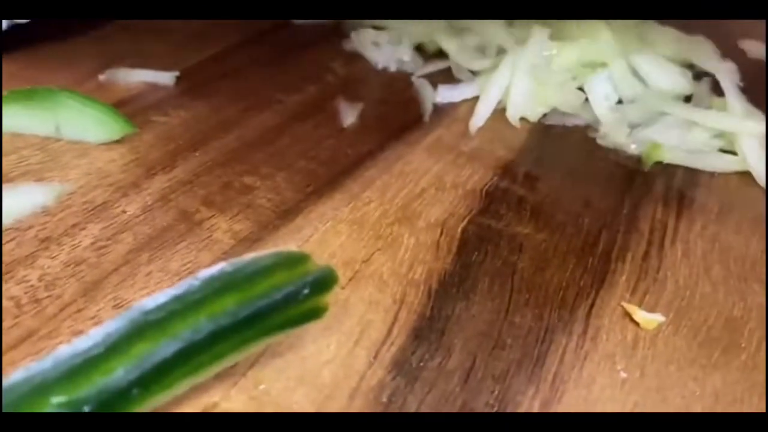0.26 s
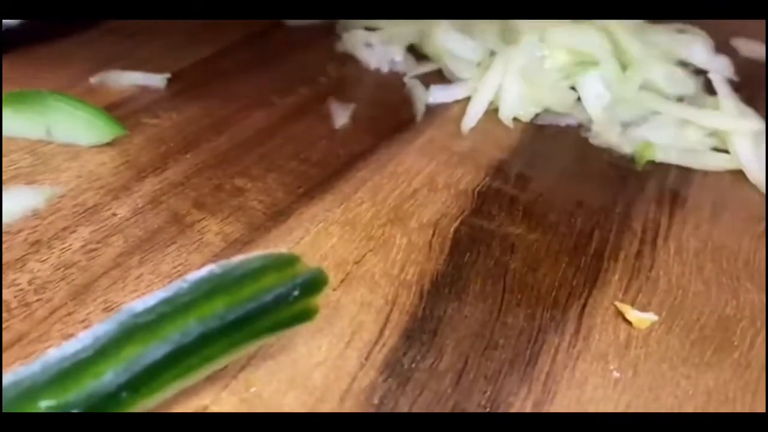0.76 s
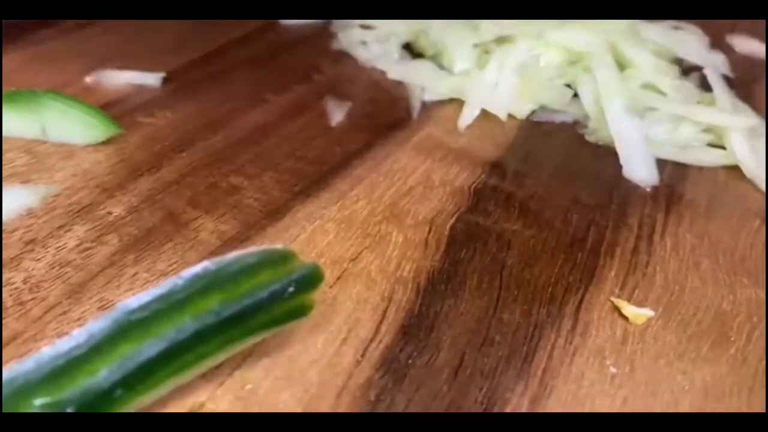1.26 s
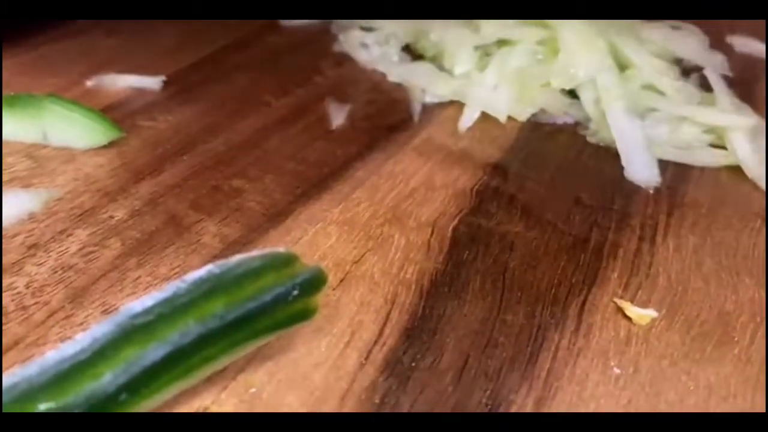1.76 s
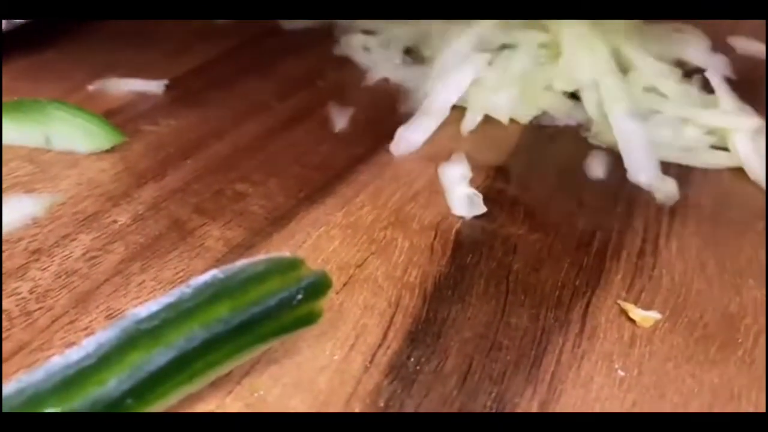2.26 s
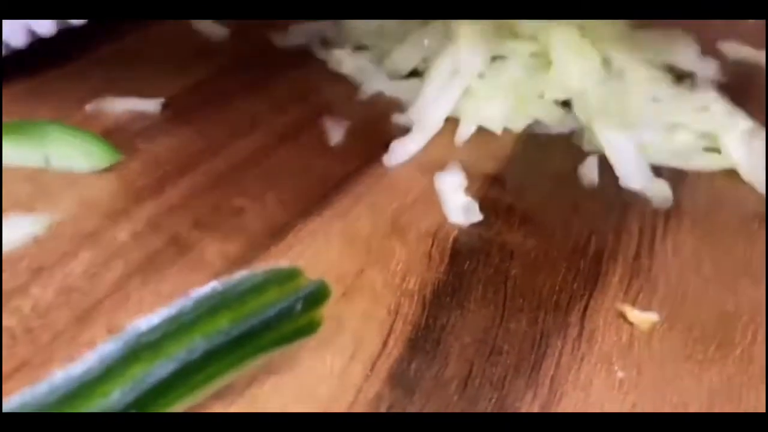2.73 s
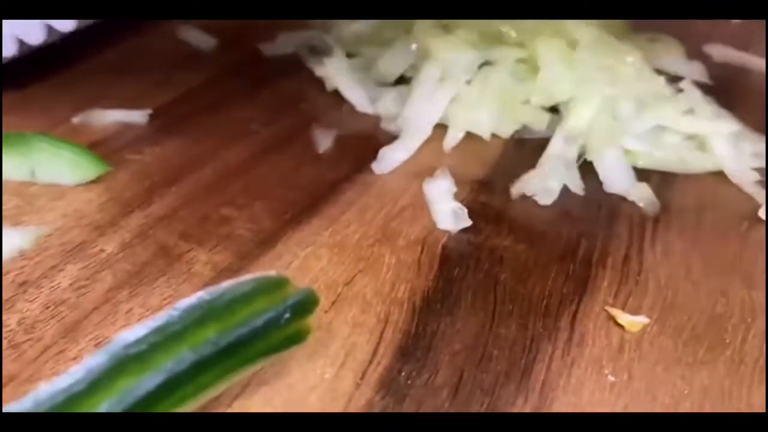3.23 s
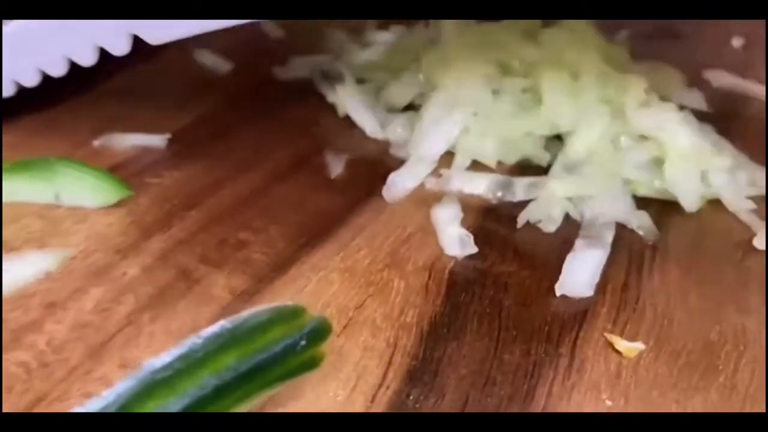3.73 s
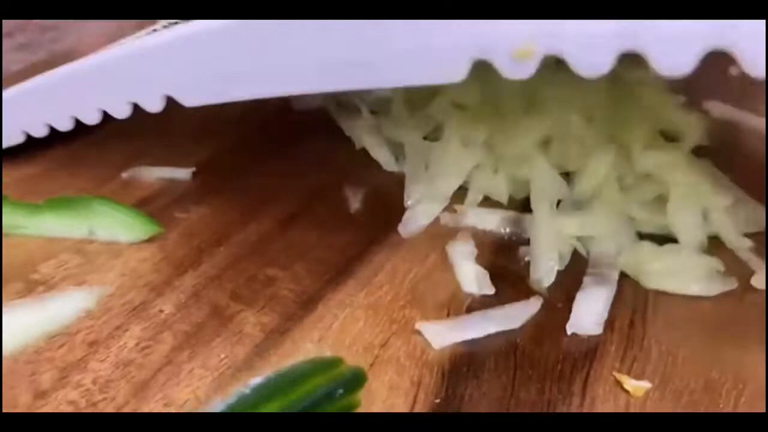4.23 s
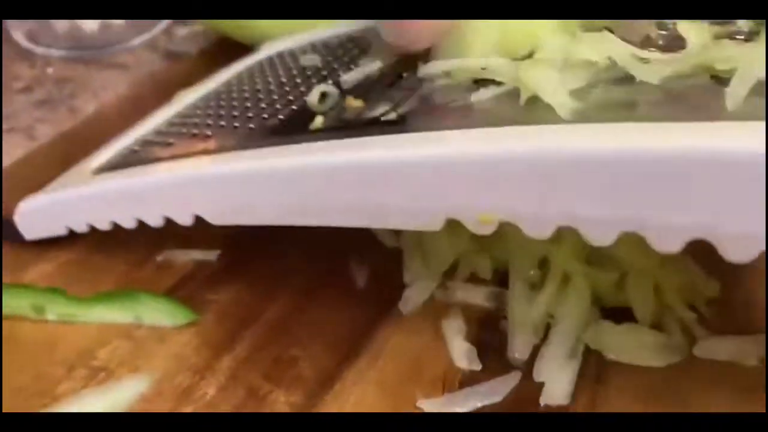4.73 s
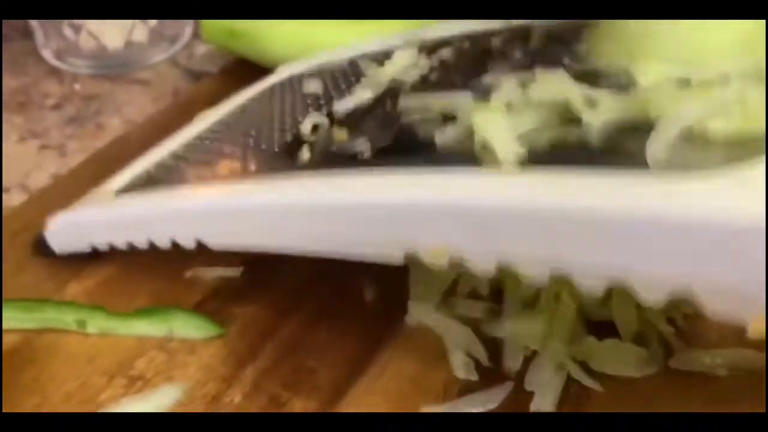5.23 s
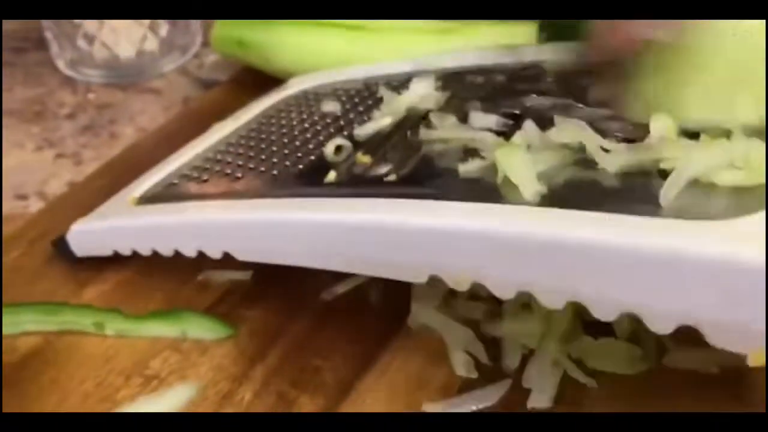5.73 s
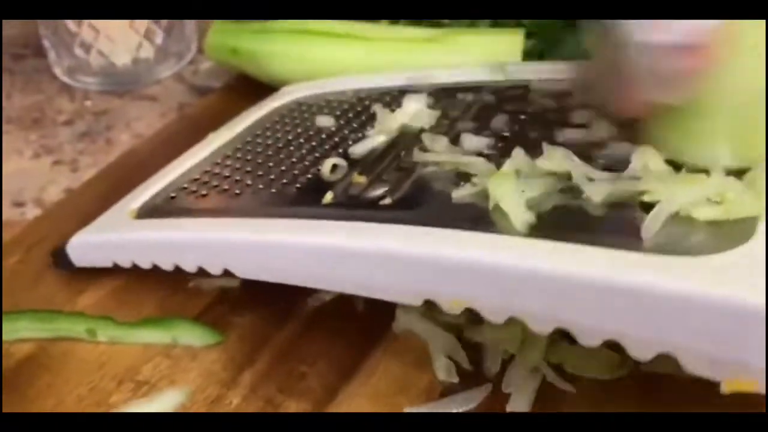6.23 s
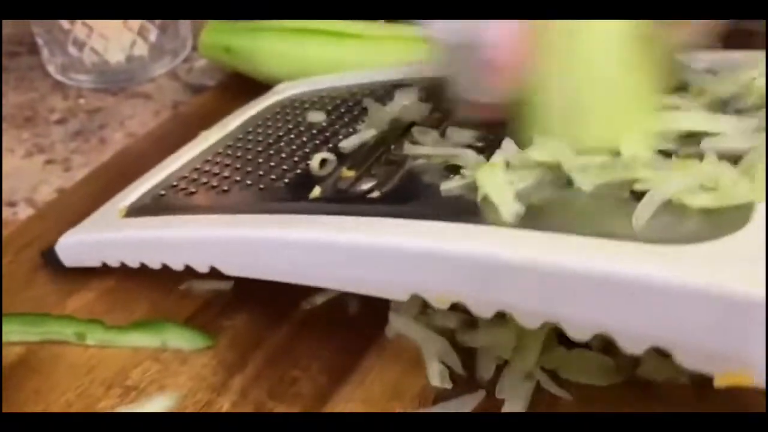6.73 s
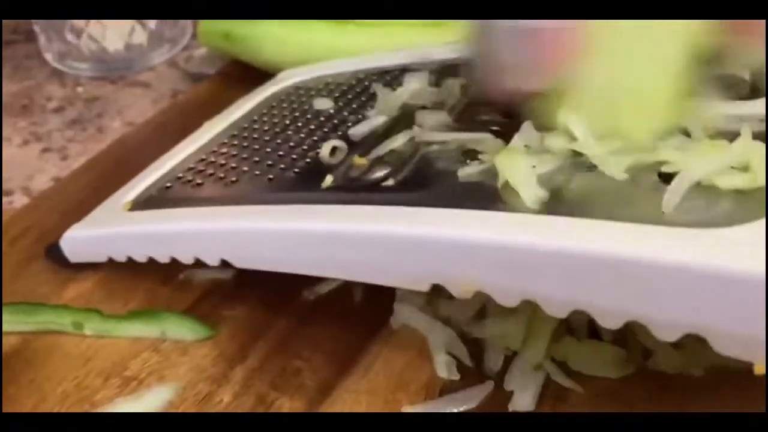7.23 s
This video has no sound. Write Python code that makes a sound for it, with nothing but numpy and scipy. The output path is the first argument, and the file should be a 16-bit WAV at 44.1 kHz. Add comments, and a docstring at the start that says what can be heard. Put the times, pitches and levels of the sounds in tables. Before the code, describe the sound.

A cucumber is rubbed briskly back and forth over a flat metal grater, wet crunchy rasps alternating loud and light, with two short pauses.

```python
"""In a small kitchen, heard from close by on a two-channel phone, a cucumber is rubbed over a flat steel grater.
The hand makes about four round trips a second, with two short rests: cuts are loud, returns light.
The teeth tear the wet flesh in dense tiny snaps, heard directly and through the sheet, frame and board.
The skin cracks now and then, and the plastic frame knocks on a wooden board.
A short room tail and a low rumble of shaped noise lie behind."""
import sys
import numpy as np
from scipy import signal
from scipy.fft import rfft, irfft
from scipy.io import wavfile

SR = 44100
rng = np.random.default_rng(int(sys.argv[2]) if len(sys.argv) > 2 else 0)


def wav_record(signal):
    """Record a signal, one row per channel, as 16-bit PCM in the file named by sys.argv[1]."""
    frames = np.transpose(np.atleast_2d(signal))
    bounded = np.clip(frames, -1, 1)
    # unit amplitude maps onto the largest positive 16-bit level
    quanta = np.round(bounded * 32767).astype(np.int16)
    wavfile.write(sys.argv[1], SR, quanta)


N = 329868

# round trips of the hand, a light return and then a cut; levels are relative:
# cut_start_s, cut_length_s, cut_level_db, return_level_db
ROUND_TRIPS = [(0.032, 0.15, -26.5, -34.5), (0.29, 0.16, -25.5, -36.5), (0.555, 0.15, -24, -31.5),
               (0.815, 0.14, -24.5, -35), (1.575, 0.152, -30.5, -41), (1.814, 0.13, -29, -34.5),
               (2.057, 0.13, -27, -33.5), (2.29, 0.14, -27.5, -33), (2.533, 0.14, -25.5, -30.5),
               (2.772, 0.15, -25, -32.5), (3.029, 0.15, -25.5, -32.5), (3.273, 0.15, -26.5, -32.5),
               (3.515, 0.16, -26.5, -30.5), (3.771, 0.18, -26, -31), (4.035, 0.17, -25.5, -31),
               (4.288, 0.16, -28, -30.5), (4.545, 0.15, -28.5, -34), (5.2, 0.14, -27.5, -40),
               (5.447, 0.14, -32, -38.5), (5.682, 0.16, -31.5, -35.5), (5.935, 0.15, -31.5, -35.5),
               (6.19, 0.15, -29, -34.5), (6.447, 0.15, -27.5, -33), (6.711, 0.16, -26.5, -35),
               (6.966, 0.16, -29, -29), (7.233, 0.17, -25, -32.5), (7.5, 0.15, -19, -28.5)]
# modes of the wooden board with the grater standing on it: mode_hz, width_hz, relative_level_db
BOARD_MODES = [(88.2, 16.3, 1), (147.6, 60, -5.5), (248.3, 13, -5)]


def undb(db):
    """Decibels to gain."""
    return 10 ** (np.asarray(db) / 20)


def unit(x):
    """Scale to rms 1."""
    return x / np.sqrt(np.mean(x ** 2))


def freqs():
    """Frequency of each spectral bin in Hz, kept off zero."""
    return np.maximum(np.arange(N // 2 + 1) * SR / N, 1)


def along(points):
    """A (Hz, value) table joined by lines on a log-frequency axis."""
    hz, value = np.transpose(points)
    return np.interp(np.log(freqs()), np.log(hz), value)


def colour(points):
    """Causal (minimum-phase) response with the given (Hz, dB) shape and unit power gain."""
    cepstrum = irfft(np.log(unit(undb(along(points)))), N)
    # folding the cepstrum forward in time makes the response causal
    cepstrum[1:N // 2] *= 2
    cepstrum[N // 2 + 1:] = 0
    return np.exp(rfft(cepstrum))


def resonator(modes):
    """Response of damped (Hz, width Hz, dB) modes of alternating sign, with unit power gain."""
    f = freqs()
    response = 0
    for k, (hz, width, db) in enumerate(modes):
        detuning = (f * f - hz * hz) / (f * width)
        response = response + (-1) ** k * undb(db) / (1 + 1j * detuning)
    return response / np.sqrt(np.mean(np.abs(response) ** 2))


def through(x, response):
    """Filter x by a frequency response."""
    return irfft(rfft(x) * response, N)


def walk(rate):
    """Random wander of rms 1, heading for a new point rate times a second."""
    points = rng.standard_normal(N // 8)
    return unit(np.interp(np.arange(N) / SR * rate, np.arange(len(points)), points))


def add(track, start_s, sound):
    """Mix a short sound into a track."""
    part = track[max(int(start_s * SR), 0):][:len(sound)]
    part += sound[:len(part)]


def burst(decay_s, size=4096):
    """A dying spatter of contact noise with unit energy."""
    push = rng.standard_normal(size) * np.exp(-np.arange(size) / SR / decay_s)
    return push / np.linalg.norm(push)


def grating(crunch_db=0.5, sheet_db=5.0, frame_db=-21, frame_law=0.86, board_db=-30, board_law=0.62):
    """The tearing is heard directly and through sheet and frame; separate noise drives the board."""
    # spectrum of the torn flesh: frequency_hz, relative_level_db
    crunch_shape = [(145, -3), (510, -8), (1330, -2.5), (2000, -4), (2600, 0), (4000, 0.9), (5200, 1.5),
                    (5900, -2), (7000, 1.6), (9500, -4), (11500, 0.5), (15800, -0.5)]
    # modes of the steel sheet, damped by the wet flesh: mode_hz, width_hz, relative_level_db
    sheet_modes = [(2627, 270, -8.5), (2953, 204, 2.5), (3220, 250, 0.5), (3358, 200, 5), (4260, 95, -10.5)]
    # modes of the plastic frame: mode_hz, width_hz, relative_level_db
    frame_modes = [(240, 12, -7.5), (396.3, 16, 7.5), (617, 38, 0.5), (737, 49, 10), (1049, 54, -1),
                   (1295, 15.5, 11.5), (1783, 170, -11)]
    speed, force, ring = hand(swell=1.94)
    tear = tearing(speed)
    crunch = undb(crunch_db) * through(tear * force, colour(crunch_shape))
    sheet = undb(sheet_db) * through(tear * ring, resonator(sheet_modes))
    # light strokes slide more than they cut, so the frame and board keep a larger share
    frame = undb(frame_db) * through(tear * force ** frame_law, resonator(frame_modes))
    shaking = rng.standard_normal(N) * force ** board_law
    board = undb(board_db) * through(shaking, resonator(BOARD_MODES))
    return crunch + sheet + frame + board


def tearing(speed, slow_rate=2500, fast_rate=9000, spread_db=3, hiss=0.57,
            catch_db=0.74, catch_rate=260, drag_db=1.84, drag_rate=80):
    """Cells burst at a rate that follows the speed; teeth catch and let go, so the level wanders."""
    # rates are per second; dividing by sqrt(chance) keeps the power steady as the speed changes
    chance = (slow_rate + fast_rate * speed) / SR
    sizes = undb(spread_db * np.minimum(rng.exponential(size=N), 5))
    signed_sizes = sizes * rng.choice([-1, 1], N)
    cells = unit((rng.random(N) < chance) * signed_sizes / np.sqrt(chance))
    wet_slide = hiss * rng.standard_normal(N)
    grip_db = catch_db * walk(catch_rate) + drag_db * walk(drag_rate)
    return unit((cells + wet_slide) * undb(grip_db))


def hand(swell):
    """Speed, crunch strength and sheet drive: in every stroke the hand speeds up, then slows to a halt."""
    # the teeth only bite above a share of the stroke's top speed; below it the flesh slides, quieter
    bite_speed, bite_width = 0.53, 0.022
    t = np.arange(N) / SR
    speed, force, ring = np.zeros((3, N))
    for start, end, db, ring_db, fastest, slide_db in strokes():
        span = (t > start) & (t < end)
        # bend time so that the speed peaks at the fastest moment
        progress = np.interp((t[span] - start) / (end - start), [0, fastest, 1], [0, .5, 1])
        arc = np.abs(np.sin(np.pi * progress))
        sliding = .5 - .5 * np.tanh((arc - bite_speed) / bite_width)
        strength = undb(db + slide_db * sliding) * arc ** swell
        speed[span] += arc
        force[span] += strength
        ring[span] += strength * undb(ring_db)
    return speed, force, ring


def strokes():
    """Every move over the teeth: (start s, end s, level dB, ring dB, fastest share of stroke, slide dB)."""
    # ring of the sheet, changing with the wet shreds on it, relative to the crunch:
    # time_s, cut_ring_db, return_ring_db
    sheet_ring = [(0, -9.5, -8.5), (3.9, -9, -11), (4.5, -13.5, -12), (5.7, -11.5, -15), (6.4, -12, -31),
                  (6.85, -16.5, -42), (7.4, -12, -11.5)]
    # in the rests the cucumber barely brushes the teeth: start_s, length_s, relative_level_db
    brushes = [(1.058, 0.078, -47.5), (1.255, 0.085, -54), (4.707, 0.2, -46.5), (4.926, 0.15, -54)]
    cut_fastest, return_fastest, brush_fastest = 0.54, 0.58, 0.74
    cut_slide_db, return_slide_db, brush_ring_db = -5, -2.5, -17
    # a return overlaps the cuts on both sides; after a rest it starts restart_s ahead of the cut
    rest_s, restart_s, leave_overlap_s, arrive_overlap_s = 0.3, 0.11, 0.016, 0.024

    times, cut_ring, return_ring = np.transpose(sheet_ring)
    moves, last_end = [], -np.inf
    for s, length, cut_db, return_db in ROUND_TRIPS:
        back = s - restart_s if s - last_end > rest_s else last_end - leave_overlap_s
        last_end = s + length
        back_ring_db = np.interp(back, times, return_ring)
        cut_ring_db = np.interp(s + length / 2, times, cut_ring)
        moves.append((back, s + arrive_overlap_s, return_db, back_ring_db, return_fastest, return_slide_db))
        moves.append((s, last_end, cut_db, cut_ring_db, cut_fastest, cut_slide_db))
    for s, length, db in brushes:
        moves.append((s, s + length, db, brush_ring_db, brush_fastest, return_slide_db))
    return moves


def roaming(x, shared_db=-4, wide_db=-11.5, ring_s=0.0039, size=4096):
    """The contact travels over the sheet: each spot rings briefly and radiates differently to each channel."""
    shared, wide = np.zeros((2, N))
    # half-overlapping pieces, each with fresh random rings
    for i in range(0, N - size // 2, size // 2):
        piece = x[i:i + size] * np.hanning(size)[:N - i]
        add(shared, i / SR, signal.fftconvolve(piece, undb(shared_db) * burst(ring_s)))
        add(wide, i / SR, signal.fftconvolve(piece, undb(wide_db) * burst(ring_s)))
    # the board and counter reflect mostly the middle range sideways: (Hz, dB)
    side_shape = [(120, 0), (600, 9.0), (1400, 11.5), (3200, 4.5), (6000, 3.5), (9500, -17)]
    wide = through(wide, undb(along(side_shape)))
    return (x + shared + wide * np.array([[1], [-1]])) / np.hypot(1, undb(shared_db))


def snaps(crack_db=20, spread=1.73, decay_s=0.0012, size=1024):
    """Teeth snap through the skin: single sharp noise bursts, each in its own broad band."""
    # loud cracks of the skin: start_s, relative_level_db, centre_hz
    skin_cracks = [(0.0508, -33, 2284), (1.4942, -24, 4640), (1.6346, -31, 4100), (2.126, -30, 4860),
                   (2.502, -27, 3270), (3.9713, -28, 6800), (5.1709, -25, 9000), (5.5536, -24.5, 8100),
                   (5.6346, -25.5, 9450), (6.686, -30.5, 5000), (6.9568, -33, 6700), (7.17, -24.5, 6160),
                   (7.2048, -22, 4270), (7.3137, -17, 8500), (7.459, -32.5, 5800)]
    track = np.zeros(N)
    for s, db, hz in skin_cracks:
        band = signal.butter(2, [hz / spread, hz * spread], "band", fs=SR, output="sos")
        crack = signal.sosfilt(band, burst(decay_s, size=size))
        add(track, s, undb(crack_db + db) * crack / np.linalg.norm(crack))
    return track


def knocks(thud_db=4, clack_db=28, push_s=0.0013, rattle_s=0.013, size=2048):
    """A soft push makes the board thud; the plastic foot clacks as it lands."""
    # hard knocks of the frame on the board: start_s, relative_level_db, clack_re_thud_db
    hard_knocks = [(0.051, -25.5, -9.5), (0.296, -30.5, -10), (0.664, -29, -12), (0.788, -28, -8.5),
                   (1.455, -30.5, -6.5), (1.514, -29.5, -13), (1.787, -30.5, -12), (2.57, -31, 0.5),
                   (2.986, -21, -12), (3.238, -23.5, -11), (3.737, -19.5, -11.5), (3.775, -24, -30),
                   (3.99, -34.5, 2), (5.181, -27.5, -9.5), (6.055, -33.5, -4.5), (6.841, -32, -6),
                   (7.006, -33.5, 0), (7.454, -22.5, -9)]
    # spectrum of the plastic clack: frequency_hz, relative_level_db
    clack_shape = [(85, -2.5), (270, 6), (600, -4), (950, -6.5), (2600, -14.5), (8000, -29)]
    thuds, clacks = np.zeros((2, N))
    age = np.arange(size) / SR / push_s
    push = (1 - age) * np.exp(-age)
    for s, db, hard_db in list(hard_knocks) + bumps():
        add(thuds, s, undb(db) * push / np.linalg.norm(push))
        add(clacks, s, undb(db + hard_db) * burst(rattle_s))
    thud = undb(thud_db) * through(thuds, resonator(BOARD_MODES))
    return thud + undb(clack_db) * through(clacks, colour(clack_shape))


def bumps(level_db=-10, scatter_db=1, hard_db=-9.5):
    """Each cut rocks the frame a little, at a random moment: (start s, level dB, clack re thud dB)."""
    place = rng.random(len(ROUND_TRIPS))
    scatter = scatter_db * rng.standard_normal(len(ROUND_TRIPS))
    return [(s + length * p, cut_db + level_db + z, hard_db)
            for (s, length, cut_db, _), p, z in zip(ROUND_TRIPS, place, scatter)]


def kitchen(x, room_db=-19, t60_s=0.33):
    """A short tail of decaying noise for the room, different in each channel."""
    t = np.arange(SR // 2) / SR
    # t60_s is the time to fall 60 dB; the tail starts after 4 ms
    tails = [burst(t60_s / np.log(1000), size=len(t)) * (t > .004) for _ in x]
    wet = np.array([signal.fftconvolve(channel, tail)[:N] for channel, tail in zip(x, tails)])
    room_shape = [(120, 3.1), (280, 11.7), (1400, 2.3), (3500, 0.23), (12000, 1)]  # (Hz, dB)
    return x + through(wet, undb(room_db + along(room_shape)))


def background(db=-44.0, waver_db=1.12, waver_rate=11):
    """A low, slightly wavering room rumble of shaped noise, alike in both channels at the bottom."""
    # spectrum of the rumble: frequency_hz, relative_level_db
    rumble_shape = [(21, -42), (36, -10.5), (61, 3.5), (94, -1.5), (154, 3.5), (202, -9), (252, -5),
                    (390, -10), (600, -19.5), (1020, -26), (2520, -30), (8050, -36.5), (15900, -40)]
    mid, side = rng.standard_normal((2, N))
    side_shape = [(62, -15.0), (155, -23.0), (410, -1.5), (1050, -5.0)]  # (Hz, dB)
    side = through(side, undb(along(side_shape)))
    noise = through(mid + side * np.array([[1], [-1]]), colour(rumble_shape))
    return unit(noise) * undb(db + waver_db * walk(waver_rate))


def scene():
    """The grater on its board in the kitchen."""
    return kitchen(roaming(grating()) + snaps() + knocks()) + background()


def record(dry, shelf_db=-14.0, top_hz=15850):
    """The phone's channels differ in level and phase; its treble is shelved down and then cut off."""
    # level between the two microphone channels: frequency_hz, left_minus_right_db
    channel_tilt = [(60, -0.5), (150, 1.5), (250, -2), (600, 3), (1200, 1), (2000, 2.5), (3300, 2.5),
                    (5000, 1.6), (8000, -1)]
    # phase between the two microphone channels: frequency_hz, left_lead_rad
    channel_phase = [(20, 0), (700, .5), (2200, -.2), (2900, .5), (3700, 0), (8100, 0), (8500, -3.1),
                     (9400, -3.1), (9800, -6.2), (11800, -6.3), (12200, -9.4), (13600, -9.4),
                     (14000, -12.6)]
    # the shelf comes in between 11.4 and 11.9 kHz
    shelf = undb(shelf_db * np.clip((freqs() - 11400) / 500, 0, 1))
    left = undb(along(channel_tilt) / 2)
    right = np.exp(-1j * along(channel_phase)) / left
    heard = through(dry, shelf * np.array([left, right]))
    lowpass = signal.ellip(10, .2, 80, top_hz, fs=SR, output="sos")
    return signal.sosfilt(lowpass, heard)


dry = scene()
out = record(dry)
wav_record(out)
```